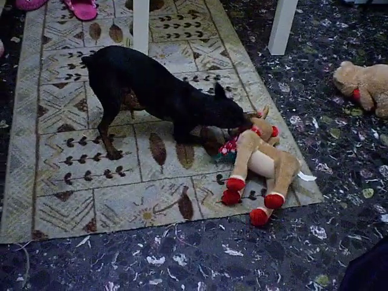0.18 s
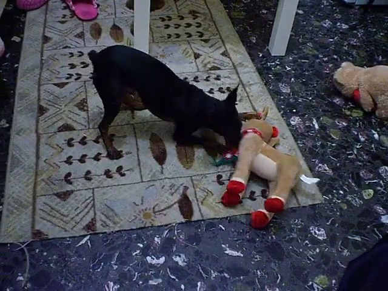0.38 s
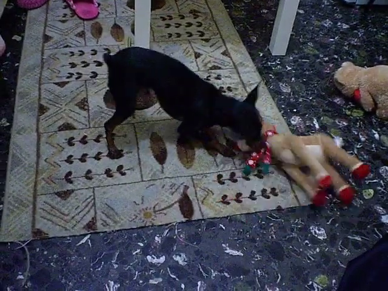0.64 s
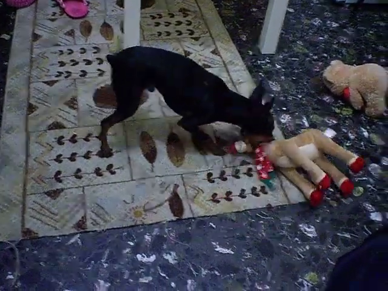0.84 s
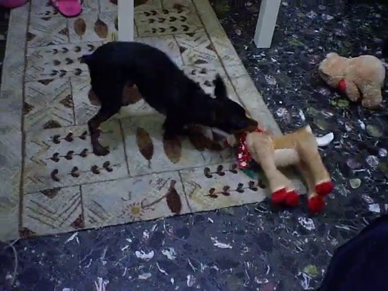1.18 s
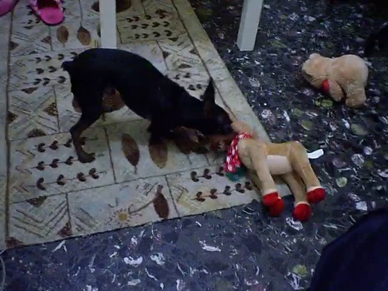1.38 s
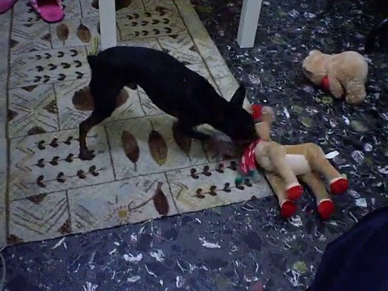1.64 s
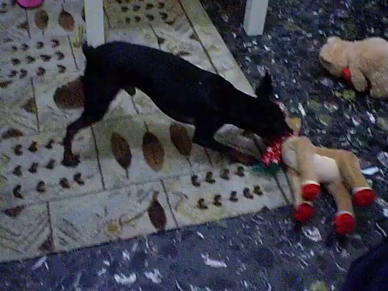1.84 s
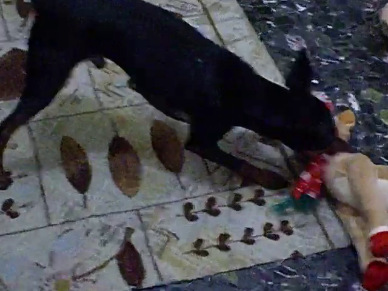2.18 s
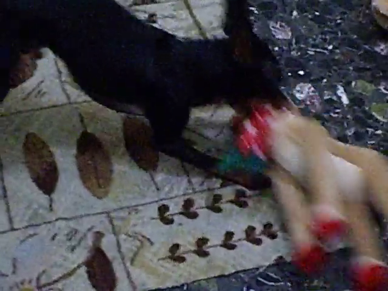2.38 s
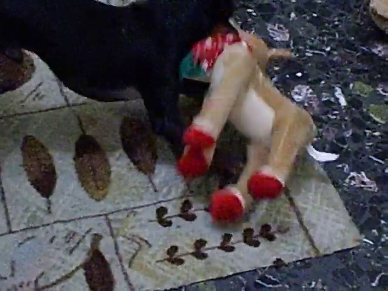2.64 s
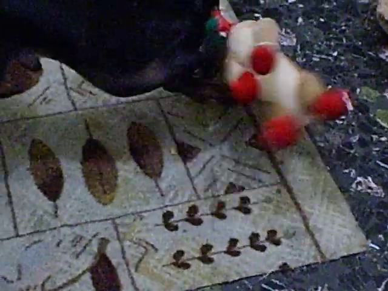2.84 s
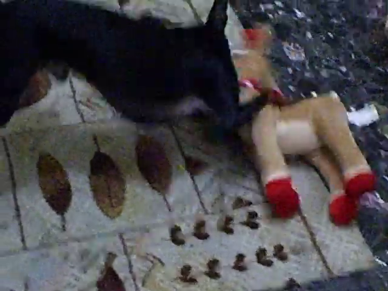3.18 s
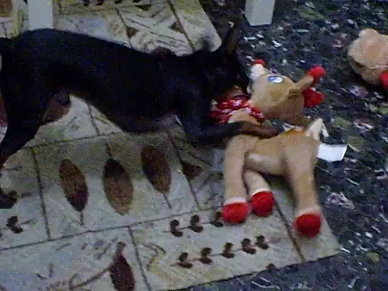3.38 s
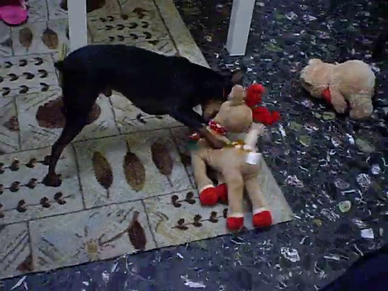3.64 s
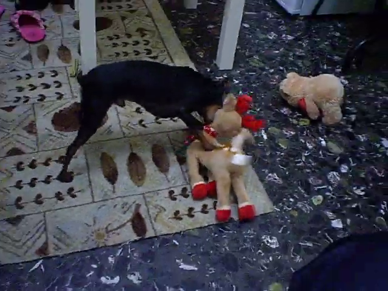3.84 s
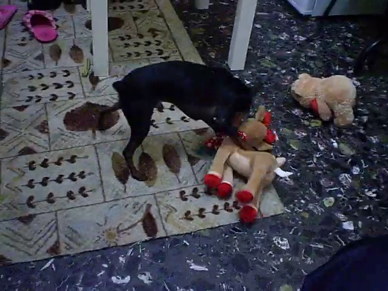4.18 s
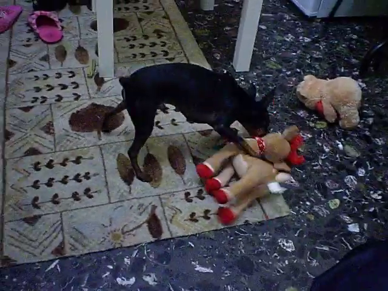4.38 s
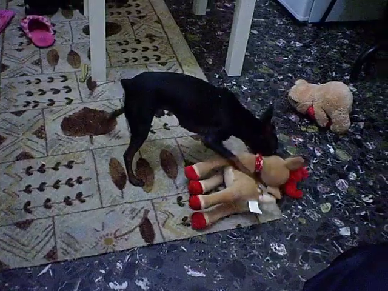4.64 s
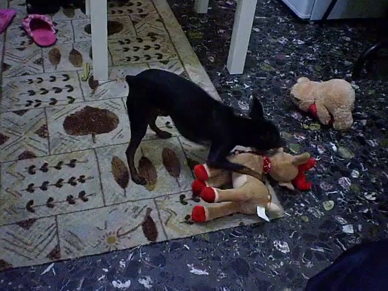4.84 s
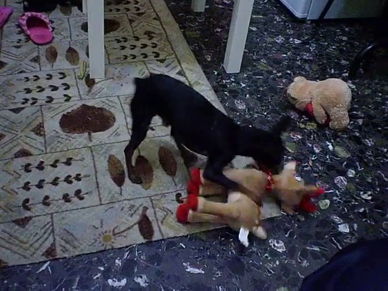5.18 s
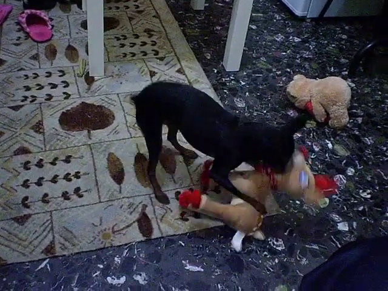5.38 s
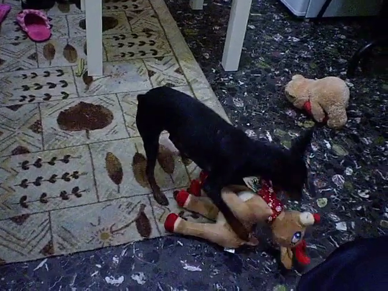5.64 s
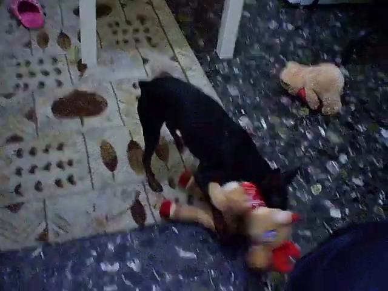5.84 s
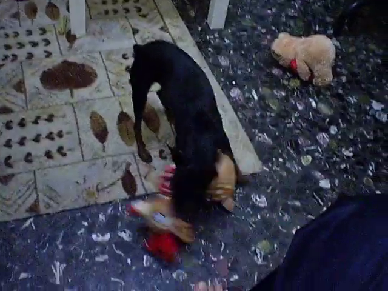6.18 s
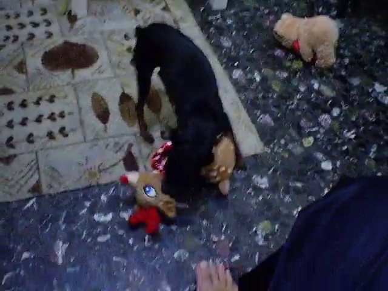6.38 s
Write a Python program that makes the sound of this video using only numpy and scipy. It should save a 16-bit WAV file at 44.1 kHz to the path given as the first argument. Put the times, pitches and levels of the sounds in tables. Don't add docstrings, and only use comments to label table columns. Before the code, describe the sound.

In a quiet room with faint mains hum and coarse hiss, a small dog wrestles a plush toy: tiny claw ticks, soft knocks and short scuffs. Four sharp plastic button snaps on the handheld device jump out, the second and fourth distorted, the first weaker. Later come a scrape, a thin squeaky rub and scattered light ticks, then mostly hiss. The sound is dull, mono and low fidelity.

```python
import sys
import numpy as np
from scipy import signal
from scipy.fft import rfft, irfft
from scipy.io import wavfile
from scipy.ndimage import uniform_filter1d

SR = 44100
rng = np.random.default_rng(int(sys.argv[2]) if len(sys.argv) > 2 else 0)


def transcribe(u):
    v = np.clip(np.atleast_2d(u).T, -1, 1)
    q = np.round(v * 32767).astype(np.int16)
    wavfile.write(sys.argv[1], SR, q)


def volts_from_db(level):
    exponent = np.asarray(level, float) / 20
    return 10 ** exponent


N = 286653

# start_s, level_db
PRESSES = [
    [(1.7038, -8), (1.7049, -9), (1.7064, -14.5)],
    [(2.2206, 8.5), (2.2213, 4.5), (2.2233, -6.5), (2.2325, -22)],
    [(3.2112, 0), (3.2120, -0.5), (3.2152, -26.5)],
    [(3.7406, 8.5), (3.7420, 1), (3.7432, -0.5), (3.7452, -20)],
]
# pitch_hz, level_db, t60_s (time to fall by 60 dB)
SHELL_CRACKS = [
    [(362, -56, 0.021), (875, -13, 0.011), (1667, -5, 0.0076), (2400, -13.5, 0.021), (2950, 3.5, 0.0093),
     (3650, 0, 0.0065)],
    [(467, -18.5, 0.0089), (857, -3.5, 0.017), (1429, -6, 0.0065), (2185, -5.5, 0.011), (3285, -3.5, 0.008),
     (3850, -1.5, 0.0023)],
    [(330, -49.5, 0.0061), (850, -22, 0.011), (1580, -22.5, 0.0051), (2260, -4, 0.0065), (3019, 5.5, 0.011),
     (3610, 2, 0.0026)],
    [(286.7, -37, 0.025), (833, -24, 0.014), (1377, -12, 0.01), (2140, -3, 0.0065), (2980, -3, 0.015),
     (3970, -0.5, .005)],
]
# pitch_hz, level_db, t60_s
SHELL_RINGS = [
    [(624, -42, .058), (1098, -30, .028), (2342, -44, .14)],
    [(290, -46, .1), (600, -43, .2), (830, -38, .05), (2363, -44, .08)],
    [(296, -42, .06), (900, -40, .04), (2800, -32, .027)],
    [(288, -43, .18), (829, -32, .035), (2330, -42, .16), (2998, -23, .033)],
]
# level_db, t60_s
RATTLES = [
    (-21, 0.036),
    (-16.5, 0.05),
    (-29.5, 0.055),
    (-12, 0.041),
]
# pitch_hz, width_hz, level_db
SHELL_COLOUR = [(926, 524, 0), (2170, 1400, -2), (3100, 430, -0.4)]

# start_s, peak_db, bright_pitch_hz, dull_level_db
FLOOR_TICKS = [(.097, -38.5, 2860, -10), (2.189, -35.5, 3240, 2), (2.281, -38, 2700, -6),
               (2.98, -36.5, 3270, -19), (3.243, -31, 2700, -14), (4.272, -36, 3280, 3),
               (4.3475, -26.5, 2440, -15), (4.642, -31.5, 3070, -26)]
TOY_TICKS = [(1.103, -36, 3620, 0), (1.225, -41, 1800, -6), (1.4732, -24, 2740, -5.5),
             (1.669, -41, 2400, -8), (3.053, -36.5, 3030, -10), (3.7225, -35, 2860, -1),
             (4.239, -29.5, 3030, -1), (4.605, -31.5, 3680, -4.5), (5.588, -39, 2220, -13)]
CLAW_TICKS = [(1.527, -37.5, 3240, -27), (2.719, -39.5, 2160, -3), (3.127, -36.5, 2200, -3),
              (3.171, -41, 2110, 11), (3.423, -33, 2300, -21), (3.4325, -34, 2330, -18),
              (3.4409, -27, 2450, -13), (3.4512, -32, 2490, -11), (4.566, -38, 2680, -18),
              (5.329, -42.5, 2140, -3), (5.577, -41, 2190, -16)]
TAG_TICKS = [(1.181, -16.5, 3070, -27), (1.655, -37.5, 3210, -24), (4.207, -30, 2790, -11),
             (4.3, -27, 3000, 5.5), (5.485, -43, 2490, -3.5)]
# dull_pitch_hz, t60_s
FLOOR, TOY, CLAW, TAG = (860, 0.012), (1500, 0.011), (1620, 0.011), (1130, 0.017)

# start_s, length_s, rise_s, pressure_db, change_db (until lift-off)
RASPS = [(1.106, 0.098, 0.013, -31.5, 3)]
SCRAPES = [(2.92, .145, 0.049, -48.5, -4.5), (3.439, 0.079, 0.0014, -37, -16.5),
           (4.285, .049, 0.023, -45, 3.5), (4.339, .044, 0.0056, -31, -9), (4.56, 0.066, .006, -49, 3)]
SQUEAKS = [(4.09, .11, .006, -44.5, -6)]
SCUFFS = [(.095, 0.046, .004, -52.5, -3), (.66, 0.029, 0.0093, -51, -12),
          (1.204, 0.059, 0.0014, -44, -11.5), (1.65, 0.027, 0.0066, -51.5, -6),
          (3.125, .03, .006, -48.5, -5), (5.577, 0.093, .003, -40, -13)]
# pitch_hz, width_hz, level_db
WEAVE = [(840, 19, -16), (1208, 100, -4), (2460, 92, 2), (3070, 41, -13), (3210, 14, -5), (3620, 210, 4.5)]
TILE = [(1130, 120, -8), (2230, 45, -9), (2450, 60, 0), (3110, 80, -3), (3620, 160, 2.5)]
SEAM = [(2110, 20, -9), (2335, 160, -11), (3030, 61, 0), (3450, 34, -9.5), (3940, 74, -8)]
PLUSH = [(995, 27, -7), (1223, 33, 0.5), (1680, 60, 2), (2000, 25, 1.5), (2220, 19, -3), (2606, 50, -9)]

# start_s, end_s, pitch_hz, level_db (over the air)
DRONES = [
    (.3, 1.15, 165, -14),
    (3.25, 3.72, 368, -12),
    (3.85, 4.2, 372, -14),
]
# pitch_hz, level_db (per Hz)
AIR_COLOUR = [(10, 2), (45, 5), (125, -3), (250, 0.5), (550, -1.5), (750, 1.5), (1250, 3.5), (1700, 1.5),
              (2100, -2.5), (3600, -2), (4400, -5)]
# pitch_hz, level_db (over the air), width_hz
HUM = [
    (99.6, -7, 2.5),
    (198.8, -20.5, 4.4),
]

RATE_UP, RATE_DOWN, STEP = 441, 80, np.sqrt(0.5) / 128
AIR_STEPS = 0.295


def evened(x):
    return x / np.sqrt(np.mean(x ** 2) + 1e-20)


def add(mix, start_s, sound):
    part = mix[round(start_s * SR):][:len(sound)]
    part += sound[:len(part)]


def resonate(x, pitch_hz, width_hz):
    pole = np.exp((2j * np.pi * pitch_hz - np.pi * width_hz) / SR)
    return 2 * signal.lfilter([1 - abs(pole)], [1, -pole], x + 0j).real


def ring(modes, size=4000):
    t = np.arange(size) / SR
    sound = np.zeros(size)
    for k, (pitch_hz, level_db, t60) in enumerate(modes):
        fade = volts_from_db(level_db - 60 * t / max(t60, 0.003))
        sound += (-1) ** k * fade * np.sin(2 * np.pi * pitch_hz * t)
    return sound


def rattle(level_db, t60):
    t = np.arange(3000) / SR
    noise = rng.standard_normal(len(t))
    coloured = np.zeros(len(t))
    for k, (pitch_hz, width_hz, db) in enumerate(SHELL_COLOUR):
        coloured += (-1) ** k * volts_from_db(db) * resonate(noise, pitch_hz, width_hz)
    return volts_from_db(level_db - 60 * t / t60) * evened(coloured)


def button():
    out = np.zeros(N)
    for blows, crack, rings, loose in zip(PRESSES, SHELL_CRACKS, SHELL_RINGS, RATTLES):
        shell = ring(crack)
        shell[0] += 2.5
        for start_s, level_db in blows:
            add(out, start_s, volts_from_db(level_db) * shell)
        first_s = blows[0][0]
        add(out, first_s, rattle(*loose))
        add(out, first_s, ring(rings, size=9000))
    return out


def tick(peak_db, bright_hz, dull_db, dull_hz, t60):
    modes = [(dull_hz, dull_db - 1.5, 1.4 * t60),
             (0.64 * bright_hz, -6, 0.5 * t60),
             (bright_hz, 0, t60),
             (1.2 * bright_hz, -4, 0.78 * t60)]
    sound = ring(modes, size=1500)
    peak = abs(sound).max()
    sound[0] += 2.5
    return volts_from_db(peak_db + 1) * sound / peak


def stroke(length_s, rise_s, pressure_db, change_db, surface):
    slips_per_s, slip_spread_db, smear_hz = 3500, 3.2, 148.4
    touch_db, ease = -10, 0.7
    bed_db = -9
    t = np.arange(0, length_s, 1 / SR)
    after_rise = np.clip((t - rise_s) / (length_s - rise_s), 0, 1)
    landing_db = touch_db * np.clip(1 - t / rise_s, 0, 1)
    force_db = pressure_db + landing_db + change_db * after_rise ** ease

    when, size, sign = rng.random((9000, 7, 3))[:len(t)].T
    heights = volts_from_db(-slip_spread_db * np.log(size + 0.013))
    slips = (when < slips_per_s / SR) * heights * np.sign(sign - 0.5)
    shared = slips[-1]
    body = np.zeros(len(t))
    for own, (pitch_hz, width_hz, level_db) in zip(slips, surface):
        body += volts_from_db(level_db) * resonate(own + 0.6 * shared, pitch_hz, width_hz + smear_hz)
    bed = resonate(np.gradient(shared), 1700, 2200)
    rub = evened(evened(body) + volts_from_db(bed_db) * evened(bed))
    return volts_from_db(force_db) * rub * signal.windows.tukey(len(t), 0.05)


def drones():
    out = np.zeros(N)
    for start_s, end_s, pitch_hz, level_db in DRONES:
        noise = rng.standard_normal(round((end_s - start_s) * SR))
        tone = evened(resonate(noise, pitch_hz, 4))
        add(out, start_s, volts_from_db(level_db) * tone * signal.windows.tukey(len(noise), 0.4))
    return AIR_STEPS * STEP * out


def room():
    pitch_hz, level_db = np.transpose(AIR_COLOUR)
    log_hz = np.log(np.fft.rfftfreq(N, 1 / SR) + 1)
    colour_db = np.interp(log_hz, np.log(pitch_hz + 1), level_db, right=-80)
    air = evened(irfft(rfft(rng.standard_normal(N)) * volts_from_db(colour_db), N))
    drift = uniform_filter1d(rng.standard_normal(N), size=6000)
    swell_db = 0.5 * evened(uniform_filter1d(drift, size=6000))

    t = np.arange(N) / SR
    hum = np.zeros(N)
    for pitch_hz, level_db, width_hz in HUM:
        waver = evened(resonate(rng.standard_normal(N), pitch_hz, width_hz))
        hum += volts_from_db(level_db) * evened(np.sin(2 * np.pi * pitch_hz * t) + 0.22 * waver)
    return AIR_STEPS * STEP * (air * volts_from_db(swell_db) + hum)


def scene():
    mix = button() + drones() + room()
    for ticks, thing in ((FLOOR_TICKS, FLOOR), (TOY_TICKS, TOY), (CLAW_TICKS, CLAW), (TAG_TICKS, TAG)):
        for start_s, *how in ticks:
            add(mix, start_s + 0.001, tick(*how, *thing))
    for strokes, surface in ((RASPS, WEAVE), (SCRAPES, TILE), (SQUEAKS, SEAM), (SCUFFS, PLUSH)):
        for start_s, *how in strokes:
            add(mix, start_s, stroke(*how, surface))
    return mix[None]


def top_cut(x):
    return signal.sosfilt(signal.butter(12, 16790, fs=SR, output="sos"), x)


def record(dry):
    near = signal.lfilter(*signal.butter(1, 96, "high", fs=SR), dry)
    sharp = signal.firwin(64 * RATE_UP + 1, 1 / RATE_UP, window=("kaiser", 8))
    slow = signal.resample_poly(near, RATE_DOWN, RATE_UP, axis=1, window=sharp)
    bits = np.clip(np.floor(slow / STEP + 0.03), -128, 127)

    edge = 2 * 4005 / (SR * RATE_DOWN)
    soft = signal.firwin(32 * RATE_UP + 1, edge, window=("kaiser", 9))
    fast = signal.resample_poly(bits, RATE_UP, RATE_DOWN, axis=1, window=soft)[:, :N]
    clipped = STEP * np.clip(fast, -128, 128)
    lowpass = signal.firwin(129, 16250, window=("kaiser", 8), fs=SR)
    mix = signal.oaconvolve(clipped, lowpass[None], "same")
    return top_cut(mix)


dry = scene()
out = record(dry)
transcribe(out)
```